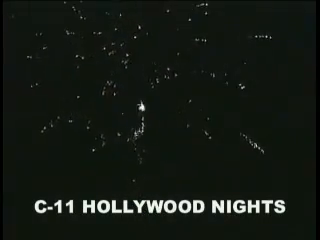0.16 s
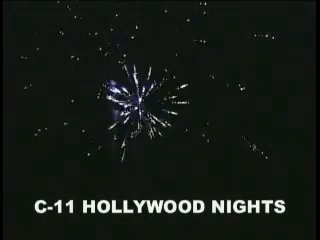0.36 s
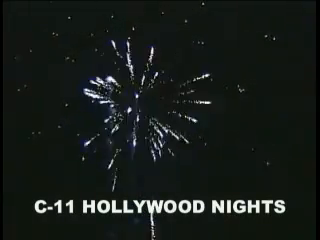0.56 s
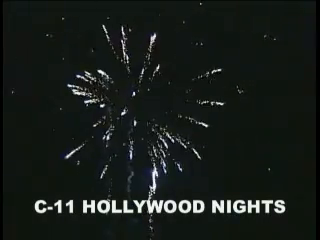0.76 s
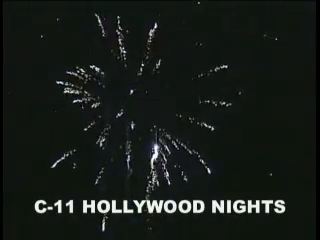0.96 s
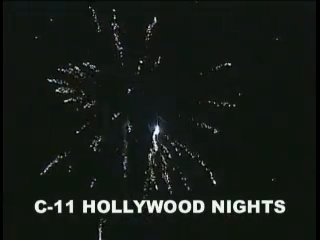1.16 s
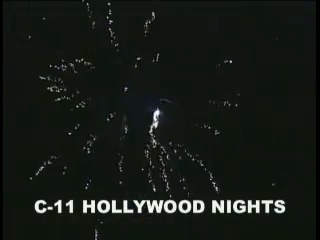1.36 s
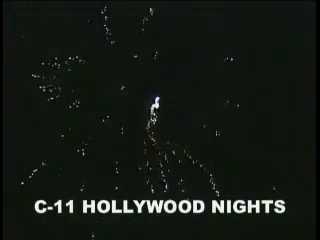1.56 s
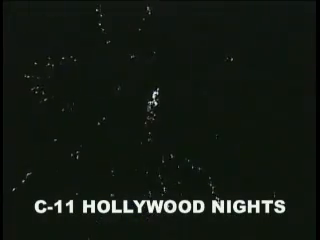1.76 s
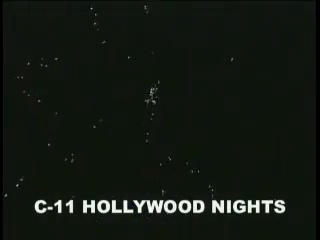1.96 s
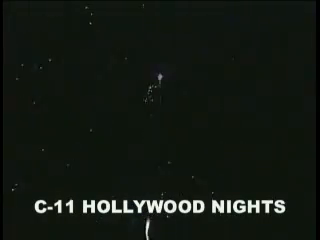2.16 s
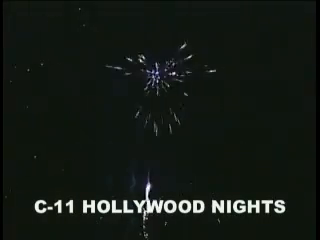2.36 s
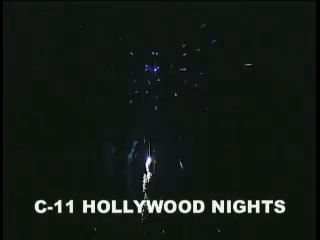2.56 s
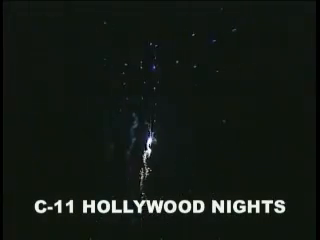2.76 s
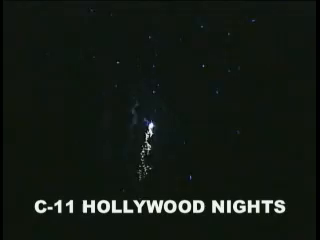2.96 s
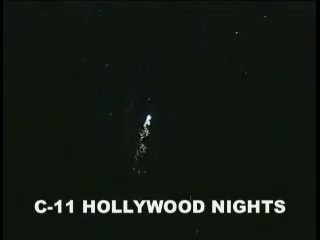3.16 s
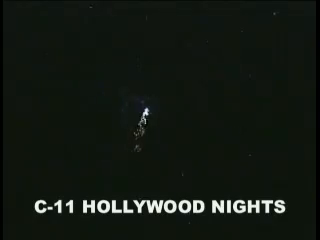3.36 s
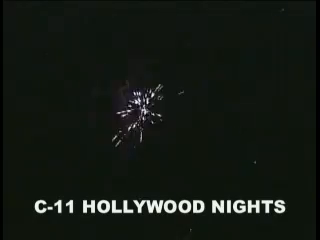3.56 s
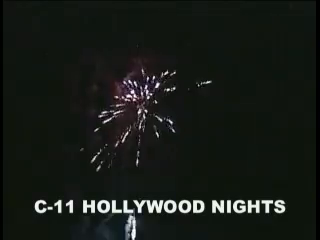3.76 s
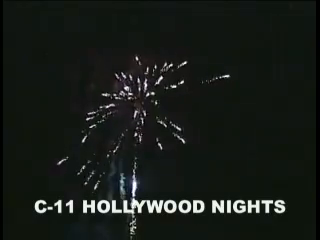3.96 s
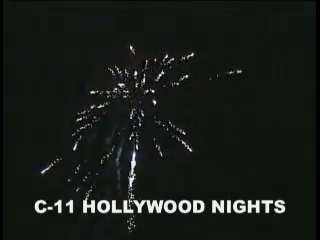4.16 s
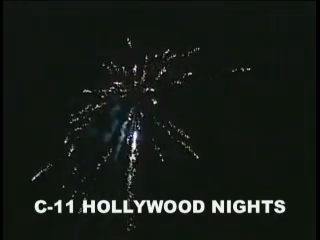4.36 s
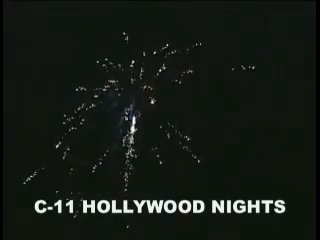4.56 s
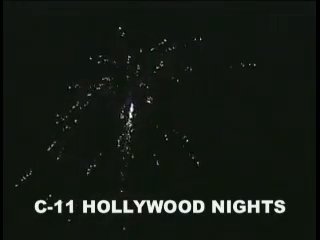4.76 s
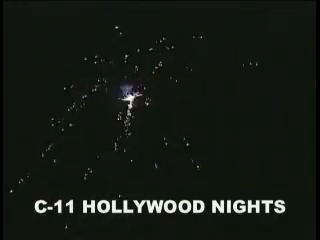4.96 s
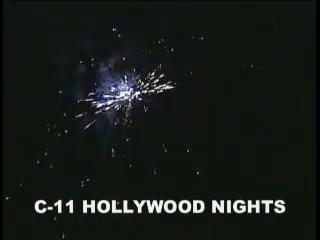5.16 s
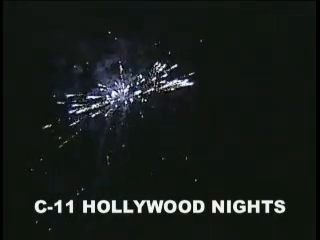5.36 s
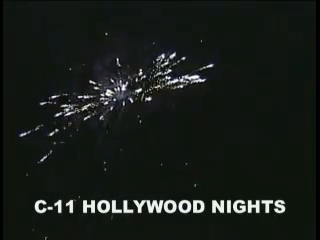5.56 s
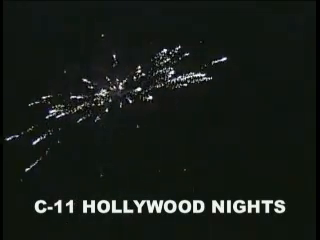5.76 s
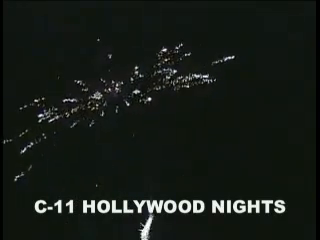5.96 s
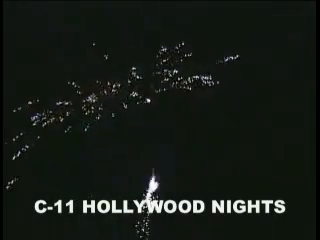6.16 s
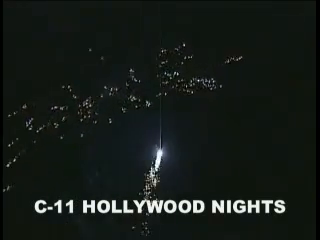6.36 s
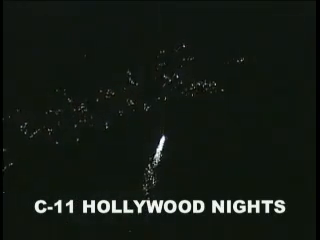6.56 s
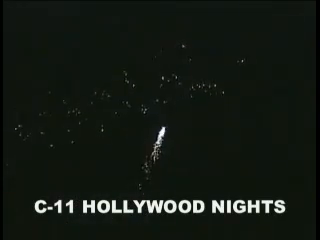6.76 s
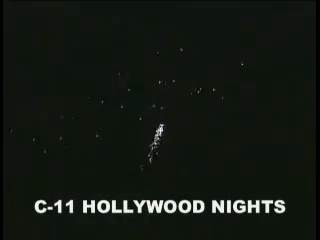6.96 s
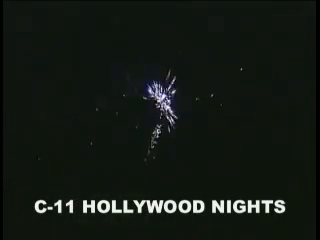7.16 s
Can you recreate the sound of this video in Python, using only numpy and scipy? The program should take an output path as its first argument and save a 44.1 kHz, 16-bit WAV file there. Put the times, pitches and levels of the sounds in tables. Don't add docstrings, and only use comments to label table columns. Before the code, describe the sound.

Firework shells crack sharply overhead at night, alternating with dull lift thuds, each blast trailing a rumbling echo roar that fades into faint hiss.

```python
import sys
import numpy as np
from scipy import signal
from scipy.fft import rfft, irfft
from scipy.io import wavfile

SR = 44100
rng = np.random.default_rng(int(sys.argv[2]) if len(sys.argv) > 2 else 0)


def log_audio(samples):
    frames = np.atleast_2d(samples).T
    limited = np.clip(frames, -1, 1)
    pcm = np.round(limited * 32767).astype(np.int16)
    wavfile.write(sys.argv[1], SR, pcm)


def ratio_of_db(decibels):
    return 10 ** (np.asarray(decibels, float) / 20)


N = 321930

# (frequency [Hz], level per Hz [dB])
NIGHT_COLOUR = [(500, -40), (840, 7.5), (1300, -39), (2500, -4), (2950, -0.5), (3500, -2), (5000, -47),
                (6050, -23), (6500, -36), (13000, -40.5)]
# (frequency [Hz], level [dB], T60 [s])
HUM_STRANDS = [
    (859, -52, 0.037),
    (2930, -58.5, .025),
]
# (frequency [Hz], level per Hz [dB])
WIND_COLOUR = [(8.8, -38), (15, -9), (27, -13), (59, -5.5), (92, -11), (110, -4.5), (140, -24), (240, -120)]
# (time [s], length [s], level [dB], low edge [Hz], high edge [Hz])
SPUTTERS = [
    (1.36, .05, -50, 3300, 3700),
    (4.4, .012, -73, 5500, 10500),
    (4.962, .006, -67, 5500, 9000),
    (5.87, .03, -76, 7000, 10000),
    (5.995, .035, -66, 6800, 11500),
    (6.135, .025, -71, 7000, 10500),
    (6.08, .13, -64, 3800, 7500),
    (6.6, .04, -50, 3200, 3700),
]
# (time [s], wave length [ms], ground echo delay [ms], ground echo [dB], side echo [dB])
SHELL_BURSTS = [
    (.26043, .76, 8.35, -2, -10),
    (2.29304, .82, 8.55, -2, -9),
    (3.499, .84, 8.25, -2, -10),
    (5.05088, .8, 8.25, -2, -12),
    (7.15206, .8, 8.3, -2, -8),
]
# (time [s], puff ahead of the blast [dB], near echoes [dB])
LIFT_CHARGES = [
    (1.51875, -22, -10),
    (3.15085, -13, -10),
    (5.3542, -17, -13),
]
# (delay [ms], level [dB])
WALL_ECHOES = [(26.9, -3), (30.7, -0.5), (35.6, -5.5), (38.9, 0), (41.5, -41), (49.6, -7), (53.3, -4.5),
               (57.2, -25), (60.3, -4)]
# (time [s], level [dB])
ROAR_SLAPS = [
    (2.3595, -11),
    (2.373, -11),
    (5.0797, -10),
    (5.1215, -10),
    (7.1785, -11),
]
# (share of the wait until the roar [0-1], gain [dB])
BURST_DUCK = [(0, -14), (.4, -9)]
LIFT_DUCK = [(0, -11), (.6, -4), (.82, -13)]
# (frequency [Hz], level per Hz [dB])
BURST_ECHO_COLOUR = [(60, -35), (200, -11), (420, -6.5), (650, 0.5), (1100, -1.5), (2000, -10),
                     (3300, -9.5), (3800, -11), (4800, -26), (6500, -29), (10000, -41.5), (14000, -47),
                     (16000, -62)]
LIFT_ECHO_COLOUR = [(60, -23), (110, -9), (220, -1.5), (420, -4.5), (560, 2), (830, -4.5), (2000, -8),
                    (2500, -12.5), (3500, -5.5), (4200, -15.5), (4800, -20.5), (6500, -25.5),
                    (10000, -39.5), (16000, -45)]
FAR_ECHO_COLOUR = [(60, -49), (120, -8.5), (220, -9), (340, -4), (420, -7.5), (620, -1.5), (840, 0.5),
                   (1100, -1), (1500, -7), (2500, -14), (3000, -16), (3700, -20), (5000, -37), (13000, -68)]
# (near echoes [dB], far echoes [dB], first far surge [dB])
BLAST_ROARS = [
    (-23.5, -28.5, -33),
    (-18, -33.5, -21),
    (-18, -29, -33),
    (-16.5, -33, -22.5),
    (-19, -29, -26),
    (-17.5, -34, -19),
    (-18, -35, -22.5),
    (-22, -32.5, -32),
    (-16, -33, -19),
]
# (boom [dB], edge [dB], rasp [dB])
ROAR_TINTS = [
    (-0.5, -1, 2),
    (0.5, 3.5, 0),
    (1, 0.5, 1),
    (-0.5, -0.5, -1),
    (3, -1, 1.5),
    (-0.5, -1, -2),
    (0, 0, -1.5),
    (1.5, -0.5, -0.5),
    (0, 0.5, -2.5),
]
# (frequency [Hz], weight [dB])
TINT_BANDS = [
    [(60, -40), (150, 0), (330, 0), (500, -40)],
    [(1000, -40), (1350, 0), (1900, 0), (2300, -40)],
    [(2400, -40), (2900, 0), (3900, 0), (4600, -40)],
]
# (frequency [Hz], weight [dB])
AIR_BAND = [(5000, -8), (9000, 1), (20000, 5)]
# (level above 13 kHz [dB], highest kept frequency [Hz])
TREBLE_EDGE = [(-74, 13000), (-71, 13800), (-66, 14700), (-59, 15000), (-56, 17000)]

NIGHT_DB, WIND_DB = -49, -55
THUMP_HZ, THUMP_DB, THUMP_T60_S = 30.4, -25, 0.15
OVERLOAD = .635
AIR_START_DB, AIR_DB_PER_S = 2.5, -16
GAP_S, GAP_DB = 0.028, -7.5
GONE_BY_S = -.07
KNEE_S = .035
SURGE_S, SURGE_WIDTH_S = 0.075, 0.028
HILL_S, HILL_WIDTH_S, HILL_DB = 1.0, 0.086, -40
ROLL_DB = 1.5
WAIT_S = (.025, .031)
BUILD_DB, BUILD_S = (-1, 0), (0.096, 0.072)
HOLD_S, FADE_DB_PER_S = (0.15, 0.072), (51.5, 75.5)
LATE_DB, LATE_FADE_DB_PER_S = (-20, -21.5), (14, 20)
FAR_SWELL_S, FAR_FADE_DB_PER_S = (0.39, 0.085), (4.0, 24)
STARVED_DB, STARVED_FRAMES, STARVED_FROM_HZ, PATCH_HZ = -22.5, 11, 9800, 450


def rms_one(x):
    return x / np.sqrt(np.mean(x ** 2) + 1e-20)


def coloured(x, points):
    hz = np.fft.rfftfreq(N, 1 / SR) + 1
    point_hz, point_db = np.transpose(points)
    weight_db = np.interp(np.log(hz), np.log(point_hz), point_db, left=-60, right=-70)
    return irfft(rfft(x) * ratio_of_db(weight_db), N)


def ring(x, hz, t60):
    radius = ratio_of_db(-60 / (t60 * SR))
    angle = 2 * np.pi * hz / SR
    return signal.lfilter([0, np.sin(angle)], [1, -2 * radius * np.cos(angle), radius * radius], x)


def dull(x, hz):
    return signal.sosfilt(signal.butter(2, hz, fs=SR, output="sos"), x)


def band(x, low_hz, high_hz):
    return signal.sosfilt(signal.butter(2, [low_hz, high_hz], "band", fs=SR, output="sos"), x)


def add(out, s, wave):
    i = round(s * SR)
    out[i:i + len(wave)] += wave[:N - i]


def n_wave(corners_ms, heights):
    return np.interp(np.arange(round(.012 * SR)) * 1000 / SR, corners_ms, heights, right=0)


def wander():
    return rms_one(coloured(rng.standard_normal(N), [(1, -10), (2, 0), (6, 0), (14, -25)]))


def night():
    swell_db = 2.0 * wander()
    return ratio_of_db(NIGHT_DB + swell_db) * rms_one(coloured(rng.standard_normal(N), NIGHT_COLOUR))


def hums():
    out = np.zeros(N)
    for hz, db, t60 in HUM_STRANDS:
        strand = rms_one(ring(rng.standard_normal(N), hz, t60))
        out += ratio_of_db(db + 2.9 * wander()) * strand
    return out


def wind():
    return ratio_of_db(WIND_DB) * rms_one(coloured(rng.standard_normal(N), WIND_COLOUR))


def diaphragm_thump():
    pushes = np.full(N, 1e-18)
    pushes[[round(blast[0] * SR) for blast in SHELL_BURSTS + LIFT_CHARGES]] = ratio_of_db(THUMP_DB)
    return ring(pushes, THUMP_HZ, THUMP_T60_S)


def sputter():
    t, white = np.arange(N) / SR, rng.standard_normal(N)
    out = np.zeros(N)
    for s, length, db, low_hz, high_hz in SPUTTERS:
        puff = np.exp(-((t - s) / length) ** 2)
        out += ratio_of_db(db) * puff * rms_one(band(white, low_hz, high_hz))
    return out


def echoes(colour, per_s, spread_db):
    sizes = ratio_of_db(spread_db * np.minimum(rng.exponential(1, N), 3)) * rng.choice([-1, 1], N)
    arrives = rng.random(N) < per_s / SR
    return rms_one(coloured(sizes * arrives, colour))


def roar_controls():
    blasts = [(GONE_BY_S, 1)]
    blasts += sorted([(b[0], 0) for b in SHELL_BURSTS] + [(b[0], 1) for b in LIFT_CHARGES])
    t = np.arange(N) / SR
    near, far, duck_db, after_lift = np.zeros((4, N))
    for (s, lift), (near_db, far_db, surge_db) in zip(blasts, BLAST_ROARS):
        on = t >= s
        age = t[on] - s
        past_hold = KNEE_S * np.logaddexp(0, (age - HOLD_S[lift]) / KNEE_S)
        build_db = near_db + BUILD_DB[lift] * np.exp(-age / BUILD_S[lift])
        early_fade = ratio_of_db(-2 * FADE_DB_PER_S[lift] * past_hold)
        late_fade = ratio_of_db(2 * (LATE_DB[lift] - LATE_FADE_DB_PER_S[lift] * past_hold))
        near[on] = ratio_of_db(2 * build_db) * (early_fade + late_fade)
        swell = 1 - np.exp(-(age / FAR_SWELL_S[lift]) ** 2)
        far[on] += ratio_of_db(2 * (far_db - FAR_FADE_DB_PER_S[lift] * age)) * swell
        far[on] += ratio_of_db(2 * surge_db) * np.exp(-((age - SURGE_S) / SURGE_WIDTH_S) ** 2)
        far[on] += ratio_of_db(2 * HILL_DB) * np.exp(-((age - HILL_S) / HILL_WIDTH_S) ** 2) * (1 - lift)
        share, db = np.transpose((LIFT_DUCK if lift else BURST_DUCK) + [(1, 0)])
        duck_db[on] = np.interp(age, share * WAIT_S[lift], db)
        after_lift[on] = lift
    return 10 * np.log10(near) + duck_db, 10 * np.log10(far) + duck_db, after_lift


def roar():
    near_db, far_db, after_lift = roar_controls()
    burst = echoes(BURST_ECHO_COLOUR, per_s=7000, spread_db=2.5)
    lift = echoes(LIFT_ECHO_COLOUR, per_s=7000, spread_db=1.0)
    far = echoes(FAR_ECHO_COLOUR, per_s=15000, spread_db=3.0)
    t = np.arange(N) / SR
    fired = np.sort([GONE_BY_S] + [b[0] for b in SHELL_BURSTS + LIFT_CHARGES])
    last = np.searchsorted(fired, t) - 1
    age = t - fired[last]
    near = np.where(after_lift, lift, burst)
    near += (ratio_of_db(AIR_START_DB + AIR_DB_PER_S * age) - 1) * coloured(near, AIR_BAND)
    waiting = after_lift * (age < GAP_S)
    near += waiting * (ratio_of_db(GAP_DB) - 1) * (near - dull(near, 1800))
    plain = ratio_of_db(near_db) * near + ratio_of_db(far_db) * far
    out = plain.copy()
    for points, db in zip(TINT_BANDS, np.transpose(ROAR_TINTS)):
        out += (ratio_of_db(db[last] + ROLL_DB * wander()) - 1) * coloured(plain, points)
    return out


def lifts():
    out = np.zeros(N)
    blast = n_wave([0, .62, .9, 1.2, 1.7, 2.2, 2.9, 4.5, 6, 9],
                   [2.4, -.7, -.58, -.36, -.2, .24, .04, .04, -.09, -.03])
    echo = dull(n_wave([0, .1, .6, 1.1, 1.6, 2.1, 3.2], [0, 1.1, .2, -1, -.6, .3, 0]), 3000)
    echo += ring(n_wave([0, .05, .1], [0, 1, 0]), 4000, .006) * ratio_of_db(-20)
    puff = ring(n_wave([0, .2, .4], [0, .2, 0]), 1300, .006)
    for s, puff_db, walls_db in LIFT_CHARGES:
        add(out, s - 9e-5, dull(blast, 2700))
        add(out, s - .0041, ratio_of_db(puff_db) * puff)
        add(out, s - .0016, ratio_of_db(puff_db + 1) * puff[:round(.0016 * SR)])
        for ms, db in WALL_ECHOES:
            add(out, s + ms / 1000, ratio_of_db(walls_db + db) * echo)
    return out


def bursts():
    out = np.zeros(N)
    echo = n_wave([0, .08, .27, .5, .8, 1.15, 1.7, 2.2, 2.7, 3.6, 4.4],
                  [-.15, 1, .75, -1, -.8, .15, -.2, -.05, .2, .03, -.1])
    ground = .88 * dull(dull(echo, 3900), 3900)
    side = n_wave([0, .3, .7, 1.1, 1.6, 2.1, 2.4], [0, .4, -1.2, .1, .35, -.45, -.45])
    for s, ms, ground_ms, ground_db, side_db in SHELL_BURSTS:
        corners = ms * np.array([0, .8, 1, 1.35, 2.2, 3.2, 4, 6, 7.5])
        wave = n_wave(corners, [3.6, -3.2, -.62, .2, .12, .03, -.07, -.07, 0])
        kick = n_wave([0, 1.2 * ms, 1.2 * ms + .05, 1.2 * ms + .1], [0, 0, 1, 0])
        housing = ratio_of_db(-21) * ring(kick, 1850, .008)
        ground_s = s + ground_ms / 1000
        add(out, s - 4e-5, dull(wave, 6500) + housing)
        add(out, ground_s - 1.6e-4, ratio_of_db(ground_db) * ground)
        add(out, ground_s - 2.6e-3, ratio_of_db(side_db) * dull(side, 2500))
    for s, db in ROAR_SLAPS:
        add(out, s, ratio_of_db(db) * dull(side, 3500))
    return out


def scene():
    background = night() + hums() + wind() + diaphragm_thump() + sputter()
    return (background + roar() + lifts() + bursts())[None]


def power_db(spectra):
    return 10 * np.log10(1.6 * np.sum(np.abs(spectra) ** 2, axis=0) + 1e-20)


def thin_treble(x, size=1152):
    hz, _, frames = signal.stft(x, SR, window="cosine", nperseg=size)
    edge_hz = np.interp(power_db(frames[hz > TREBLE_EDGE[0][1]]), *np.transpose(TREBLE_EDGE))
    running_mean = np.ones(STARVED_FRAMES) / STARVED_FRAMES
    busy = signal.lfilter(running_mean, 1, power_db(frames) - STARVED_DB) > 0
    patch = (hz // PATCH_HZ).astype(int)
    patch_luck = rng.random((patch[-1] + 1, frames.shape[1]))[patch]
    luck = patch_luck * .6 + rng.random(frames.shape[1]) * .4
    hz = hz[:, None]
    calm_risk = .3 * (hz > 11000) * (edge_hz < 13100)
    risk = np.where(busy, (hz - STARVED_FROM_HZ) / 4300, calm_risk)
    kept = (hz < edge_hz) & (luck > risk)
    return signal.istft(frames * kept, SR, window="cosine", nperseg=size)[1][:N]


def low_pass(x):
    return signal.sosfilt(signal.butter(12, 16470, fs=SR, output="sos"), x)


def record(dry):
    clipped = np.clip(dry[0], -OVERLOAD, OVERLOAD)
    mix = thin_treble(dull(clipped, 13500))[None]
    return low_pass(mix)


dry = scene()
out = record(dry)
log_audio(out)
```